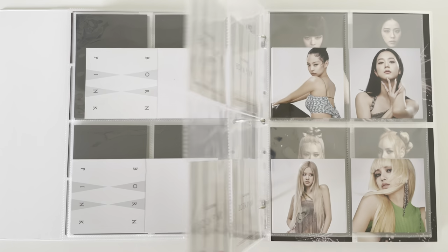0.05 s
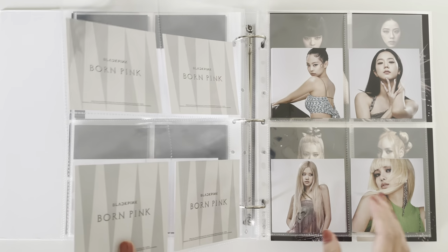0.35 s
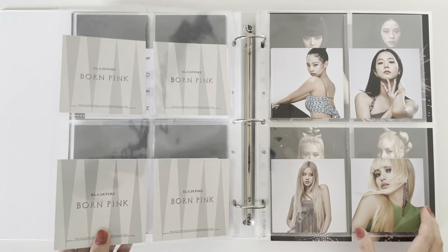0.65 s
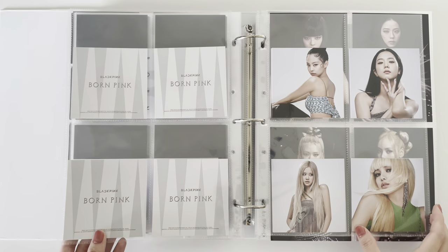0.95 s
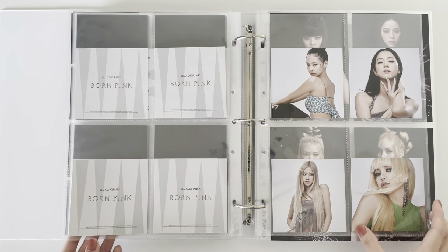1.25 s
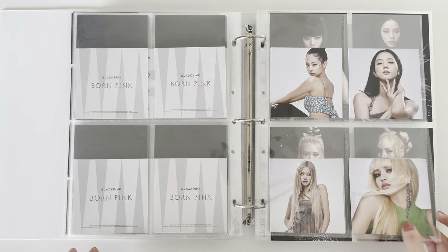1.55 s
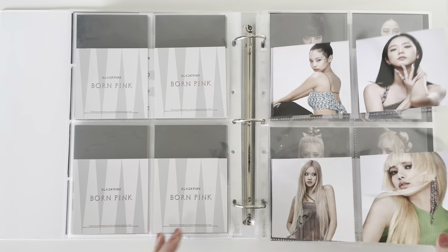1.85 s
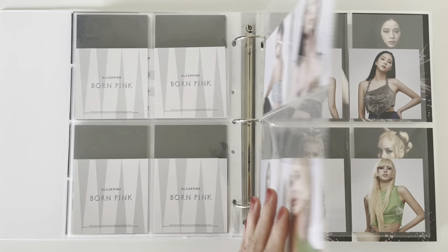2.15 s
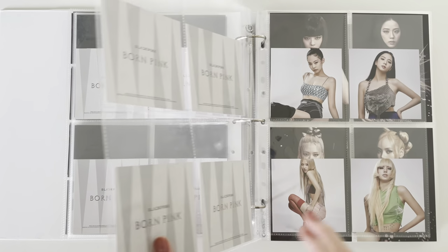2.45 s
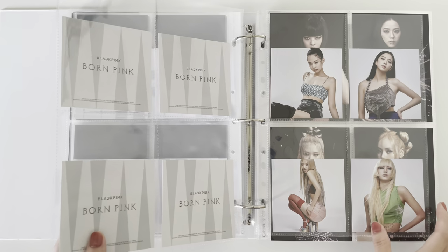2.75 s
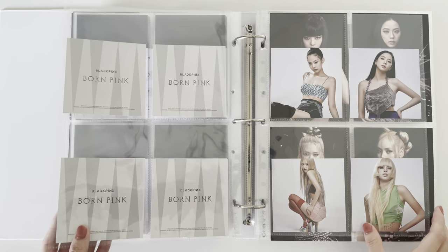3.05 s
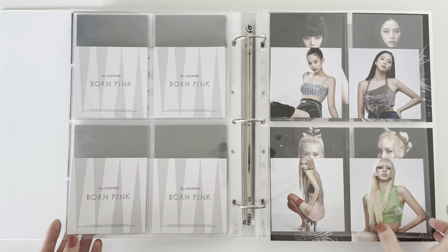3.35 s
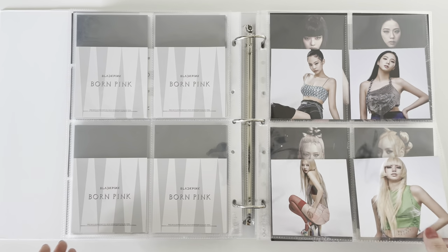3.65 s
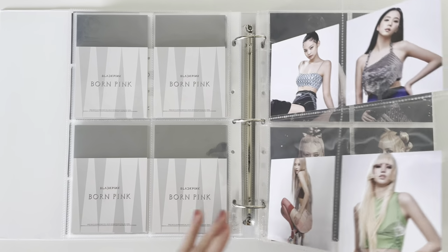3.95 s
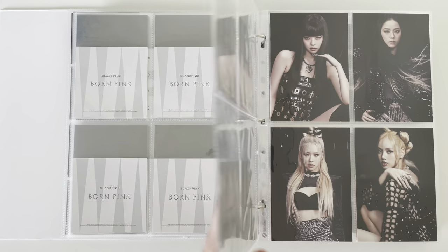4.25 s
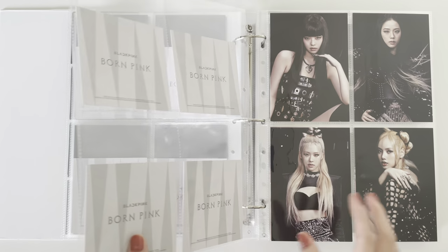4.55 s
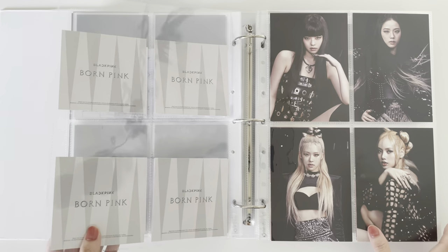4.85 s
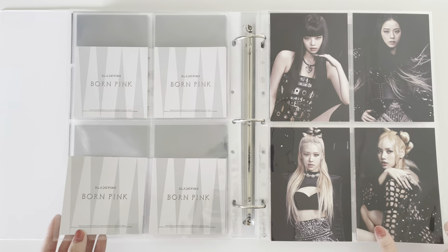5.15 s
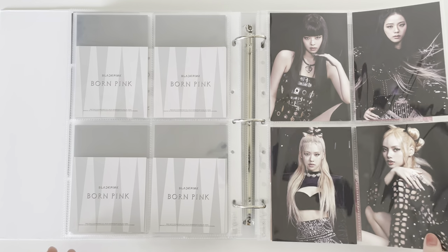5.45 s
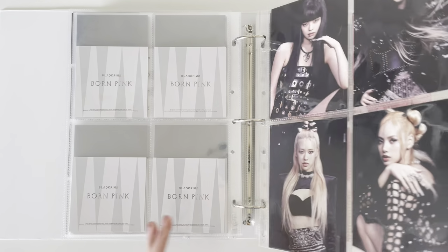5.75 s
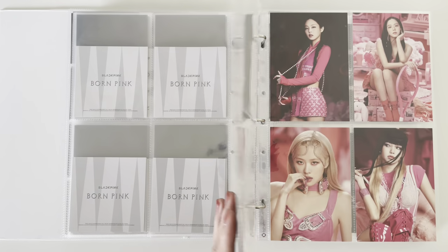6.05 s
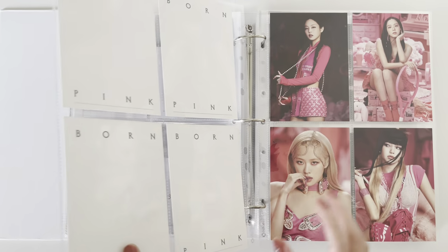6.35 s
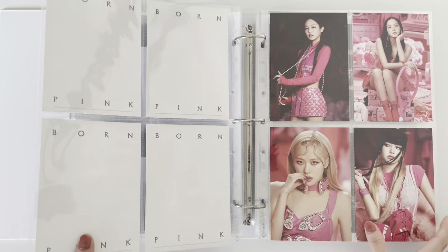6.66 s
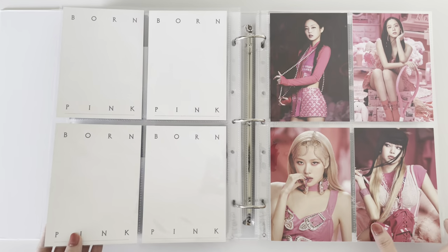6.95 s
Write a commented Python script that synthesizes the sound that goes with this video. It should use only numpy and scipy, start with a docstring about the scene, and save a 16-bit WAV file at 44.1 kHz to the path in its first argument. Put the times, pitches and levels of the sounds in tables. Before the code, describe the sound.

Plastic binder pages rustle and crinkle as they are turned, landing with light slaps and soft thumps over a low hum.

```python
"""Turning pages in a card binder

Plastic pocket pages full of cards are turned in a ring binder on a table, close to a phone.
The film slides with a hiss, flutters as it bends and buckles with small pops. Each landing page
pushes out air with a thump and sets the steel rings ringing. A low, uneven hum fills the small room."""
import sys
import numpy as np
from scipy import signal
from scipy.fft import rfft, irfft
from scipy.io import wavfile
from scipy.ndimage import uniform_filter1d

SR = 44100
rng = np.random.default_rng(int(sys.argv[2]) if len(sys.argv) > 2 else 0)


def inscribe(sig):
    """Save sig as 16-bit PCM at rate SR to the path in sys.argv[1].

    A 1-D sig is mono; a 2-D sig holds one channel per row.
    Samples are clipped to [-1, 1] before scaling.
    """
    pcm = np.round(np.clip(np.atleast_2d(sig).T, -1, 1) * 32767)
    wavfile.write(sys.argv[1], SR, pcm.astype(np.int16))


N = 313551
TIME, FREQS = np.arange(N) / SR, np.fft.rfftfreq(N, 1 / SR)
LEAD = 256  # samples of run-up before each snap


def gain_of(db):
    """Turns decibels into a number to multiply by."""
    return 10 ** (np.asarray(db) / 20)


def evened(x):
    """Scales a sound to an average strength (rms) of 1."""
    return x / np.sqrt(np.mean(x ** 2) + 1e-20)


def read(points, hz):
    """Looks up a table along a log-frequency axis."""
    f, value = np.transpose(points)
    return np.interp(np.log(hz + 1), np.log(f + 1), value)


def follow(rows):
    """Joins a table's timed points into curves."""
    s, *columns = np.transpose(rows)
    return [np.interp(TIME, s, column) for column in columns]


def add(mix, s, sound):
    """Mixes a sound in at s seconds."""
    part = mix[..., max(round(s * SR), 0):][..., :sound.shape[-1]]
    part += sound[..., :part.shape[-1]]


def coloured(x, points):
    """Gives x a tone colour, at strength 1."""
    return evened(irfft(rfft(x) * gain_of(read(points, FREQS)), N))


def spread(mid, side, share):
    """Makes left and right from a common and an opposed part."""
    return np.array([mid + share * side, mid - share * side]) / np.sqrt(1 + share ** 2)


def wavering(hz, depth, rate_hz):
    """A tone whose strength and phase drift by chance."""
    slow = np.exp(-(FREQS / rate_hz) ** 2)
    a, b = evened(irfft(rfft(rng.standard_normal((2, N))) * slow, N))
    turn = np.exp(2j * np.pi * np.cumsum(hz * np.ones(N)) / SR)
    return evened((turn * (1 + depth * (a + 1j * b) / np.sqrt(2))).real)


# The low drone. Each row: time in seconds, level in dB, pitch in Hz.
DRONE_CURVE = [(0.0, -69, 61.8), (0.16, -46.5, 56.1), (0.26, -72, 54.7), (0.34, -48, 54.3),
               (0.91, -47, 53.93), (1.15, -65.5, 57.2), (1.21, -41.5, 55.8), (1.27, -54.5, 53.6),
               (1.84, -41, 52.4), (2.04, -51.5, 53.35), (2.22, -43.5, 57), (2.43, -54, 59.6),
               (2.55, -46, 56.3), (2.93, -52.5, 54.5), (3.23, -45, 55.35), (3.44, -53, 55.4),
               (3.66, -52, 62.1), (3.86, -45, 55.1), (4.12, -54.5, 53.25), (4.36, -51.5, 61.3),
               (4.59, -50, 53.5), (4.75, -47, 53.2), (5.09, -62.5, 53.35), (5.31, -43.5, 53.3),
               (5.5, -58, 53.4), (5.66, -46.5, 52.8), (5.74, -69, 51), (5.98, -49.5, 56.14),
               (6.12, -67, 62.1), (6.28, -47, 52.84), (7.01, -56, 57.64), (7.11, -47, 54.1)]
# The mains tone. Each row: time in seconds, relative level in dB.
MAINS_CURVE = [(0.0, -83), (0.06, -55), (0.38, -76), (0.81, -57), (1.54, -89), (1.78, -53.5), (2.18, -67.5),
               (2.47, -58), (3.01, -78), (3.17, -62.5), (6.28, -65.5), (6.36, -56), (6.65, -66),
               (7.11, -68)]
# The colour of the room's air. Each row: frequency in Hz, gain in dB.
AIR_COLOUR = [(20, -25), (31, -0.5), (40, -11), (55, 10.5), (70, 10.5), (88, 2), (140, -3), (200, -16.5),
              (400, -25), (1000, -38), (3000, -43), (6000, -48), (15000, -97)]
def hum():
    """A wavering low drone, a weaker mains tone and the room's own air."""
    level_db, hz = follow(DRONE_CURVE)
    drone = gain_of(level_db) * wavering(hz, depth=0.55, rate_hz=6.6)
    mains = gain_of(follow(MAINS_CURVE)[0] + 0.5) * wavering(hz=100, depth=0.79, rate_hz=3.3)
    common, opposed = rng.standard_normal((2, N))
    # long waves reach both microphones alike
    opposed = irfft(rfft(opposed) * gain_of(read([(70, -28), (140, -11), (300, 3.5)], FREQS)), N)
    air = gain_of(-57.5) * coloured(spread(common, opposed, share=1), AIR_COLOUR)
    return drone + mains + air


def stroke(s, swell_s, ease_s):
    """A hand movement peaks at s; it is 19.5 dB down swell_s before and ease_s after."""
    near = slice(*np.searchsorted(TIME, [s - 4 * swell_s, s + 4 * ease_s]))
    away = np.maximum((s - TIME[near]) / swell_s, (TIME[near] - s) / ease_s)
    out = np.zeros(N)
    out[near] = gain_of(-19.5 * abs(away) ** 1.345)
    return out


def friction(colour, slips_per_s, uneven_db, smooth, patchy_db, width):
    """Tiny uneven slips over a smooth hiss; the film's resonances drift as it bends."""
    sizes = gain_of(uneven_db * np.minimum(rng.exponential(1, (2, N)), 4))
    slips = evened(sizes * rng.choice([-1, 1], (2, N)) * (rng.random((2, N)) < slips_per_s / SR))
    drive = spread(*(slips + smooth * rng.standard_normal((2, N))), share=width)
    bands = signal.stft(drive, nperseg=512, noverlap=384)[2]
    # random loud and soft patches, blurred over pitch, then time
    patches = uniform_filter1d(rng.standard_normal(bands.shape[1:]), size=4, axis=0)
    patches = evened(uniform_filter1d(patches, size=14, axis=1))
    drifting = signal.istft(bands * gain_of(patchy_db * patches), nperseg=512, noverlap=384)[1]
    return coloured(drifting[:, :N], colour)


# Film slides. Each row: peak time, swell and ease in seconds, hiss in dB, airy top in dB.
SLIDE_STROKES = [(.005, 0.032, 0.078, -57, -57), (.24, 0.032, 0.039, -56.5, -70),
                 (.53, .04, 0.12, -78.5, -76), (.78, 0.16, 0.25, -87, -81), (.97, 0.12, 0.094, -85, -80),
                 (1.16, 0.077, 0.11, -81, -74), (1.329, 0.013, 0.036, -56, -62),
                 (1.43, 0.097, 0.076, -70.5, -67.5), (1.595, .05, 0.047, -62.5, -70),
                 (1.785, 0.078, 0.044, -74, -67), (2.27, .11, 0.082, -65.5, -65),
                 (2.479, 0.073, 0.087, -60, -65), (2.69, .18, 0.24, -77.5, -74),
                 (3.14, 0.07, 0.17, -77, -73.5), (3.35, 0.11, 0.21, -72.5, -68.5),
                 (3.515, 0.024, 0.063, -72.5, -69), (3.65, 0.026, 0.085, -70, -68),
                 (4.21, .12, .14, -74.5, -74.5), (4.325, 0.058, 0.061, -70.5, -74),
                 (4.455, 0.068, 0.072, -74, -80), (4.7, 0.44, .35, -87, -79.5),
                 (5.02, 0.13, 0.21, -76, -73.5), (5.29, .2, 0.14, -68.5, -65.5),
                 (5.71, .06, 0.04, -74, -76), (6.11, 0.052, 0.097, -66.5, -68),
                 (6.32, 0.054, 0.11, -65, -67.5), (6.469, .12, 0.16, -86, -80),
                 (6.81, 0.2, 0.08, -76.5, -73), (7.08, 0.14, 0.11, -65.5, -69.5)]
# Their colour. Each row: frequency in Hz, gain in dB.
SLIDE_COLOUR = [(1500, -13), (3500, -1), (5000, 2), (6200, 7), (8000, 10.5), (10000, -24), (12000, 11.5),
                (14500, 12.5), (15500, 9.5), (16300, -3)]
def sliding():
    """Film hisses as it slides on film; its airy top has a strength of its own."""
    hiss_power = airy_power = gain_of(-87) ** 2  # pages barely stirring
    for s, swell_s, ease_s, hiss_db, airy_db in SLIDE_STROKES:
        shape = stroke(s, swell_s, ease_s)
        hiss_power = hiss_power + (gain_of(hiss_db) * shape) ** 2
        airy_power = airy_power + (gain_of(airy_db) * shape) ** 2
    skim = friction(SLIDE_COLOUR, slips_per_s=5600, uneven_db=6.5, smooth=1.2, patchy_db=3.5, width=0.7)
    airy = irfft(rfft(skim) * (FREQS > 10300), N)
    return np.sqrt(hiss_power) * evened(skim - airy) + np.sqrt(airy_power) * evened(airy)


def snap(shape_db, rise_s, scatter_db, scatter_fade_s, size=4096):
    """A crease gives way in a short run of slips; the burst then scatters among the pages."""
    hz, t = np.fft.rfftfreq(size, 1 / SR), np.arange(size) / SR
    log_gain = np.log(gain_of(np.maximum(shape_db(hz + 1), -70)))
    # a filter that rings only after it is struck
    colour = np.exp(np.conj(signal.hilbert(np.r_[log_gain, log_gain[-2:0:-1]])))[:len(hz)]
    burst = rfft(rng.standard_normal(size) * t * np.exp(-t / rise_s))
    pulse = colour * burst / abs(burst) ** .7
    pulse *= np.exp(-2j * np.pi * 0.00035 * np.sqrt(hz * 4000))  # bending waves bring the treble first
    scatter = spread(*rng.standard_normal((2, size)), share=0.71)
    scatter *= gain_of(-60 * t / scatter_fade_s) * (1 - np.exp(-t / 0.0006))
    sound = evened(irfft(pulse)) + gain_of(scatter_db) * evened(irfft(pulse * rfft(scatter)))
    sound = np.roll(sound, LEAD, axis=1) * signal.windows.tukey(size, LEAD / size)
    return sound * np.sqrt(.005 * SR / size)  # the direct burst has the energy of 5 ms at strength 1


def pop(hz, octaves, rise_s):
    """The dull pop of a pocket, over some low body of the cover."""
    def shape_db(f):
        cover = read([(100, -38), (220, -19), (380, 0), (550, -20), (900, -3.5), (3000, -64)], f)
        pocket = -15 * np.log(1 + (np.log2(f / hz) / octaves) ** 2 / 2.31)
        treble_loss = 11 * np.maximum(np.log2(f / 3700), 0)
        return np.maximum(pocket - treble_loss, cover)
    return snap(shape_db, rise_s, scatter_db=-1.5, scatter_fade_s=0.074)


# The colour of a cracking crease. Each row: frequency in Hz, gain in dB.
CRACK_COLOUR = [(1000, -23), (3000, 6), (4200, 1.5), (5000, -2), (6200, 4), (8000, 1.5), (10000, -16.5),
                (13000, -1.5), (16000, -11)]
def crack(level_db, rise_s):
    """The quick, bright part of a buckle."""
    sound = snap(lambda f: read(CRACK_COLOUR, f), rise_s / 2, scatter_db=3, scatter_fade_s=0.013)
    return gain_of(level_db - 1.5) * sound


# Pockets buckle. Each row: start in seconds, pop level in dB, pop pitch in Hz,
# relative crack level in dB, pop rise in seconds.
BUCKLES = [(.008, -51, 1960, -47.5, 0.00053), (.018, -68, 1320, -57, 0.001), (.0419, -49, 1560, -54, .0017),
           (.132, -44.5, 1280, -83, .0005), (.22, -56, 980, -61, 0.00045),
           (.2259, -54.5, 930, -60, 0.00029), (.7187, -49.5, 1158, -78, 0.0006),
           (.8769, -63, 1230, -100, 0.00018), (.9555, -56, 710, -88, .0003),
           (1.3275, -67, 1676, -62, 0.002), (1.3466, -60.5, 875, -75, 0.00087),
           (1.7314, -44, 1370, -81.5, 0.000075), (1.768, -61, 945, -73, 0.00025),
           (1.9732, -62, 1270, -86, 0.00099), (2.2875, -48, 2250, -59, 0.00085),
           (2.4207, -44.5, 1020, -62, 0.001), (2.4292, -43.5, 880, -60, 0.00085),
           (2.4359, -44.5, 764, -70, 0.00074), (2.5765, -51, 2060, -100, 0.00075),
           (3.1233, -59.5, 1053, -89, .001), (3.504, -81, 1755, -67, 0.0014),
           (3.6276, -57, 1967, -66, 0.00015), (3.6492, -53, 1340, -89, 0.00038),
           (3.6746, -46, 870, -56.5, 0.00028), (3.856, -52, 960, -76.5, 0.0003),
           (3.8766, -54, 1084, -97, 0.00086), (4.1156, -61, 661, -91, .002), (4.207, -67, 815, -75, .0014),
           (4.3089, -63, 1190, -82, 0.0013), (4.3266, -55, 1122, -63.5, 0.0013),
           (4.3793, -52, 598, -85, 0.00086), (4.4459, -51, 1760, -92, 0.0014),
           (5.0514, -59, 1106, -97, 0.00048), (5.3677, -64, 1617, -73, 0.0016),
           (5.4998, -57.5, 706, -71, 0.0013), (5.755, -59, 569, -92, 0.0011),
           (6.0829, -54.5, 802, -61.5, .0013), (6.1107, -53, 1608, -51.5, .0014),
           (6.1524, -58.5, 843, -68, 0.0017), (6.5773, -55.5, 684, -97, 0.0014),
           (6.7713, -55.5, 823, -86, 0.0022)]
def buckles():
    """The pocket pops and its crease cracks; a harder crack widens the pop's range of pitch."""
    out = np.zeros((2, N))
    for s, pop_db, hz, crack_db, rise_s in BUCKLES:
        octaves = 1.95 * 2 ** ((crack_db - pop_db) / 18)
        add(out, s - LEAD / SR, gain_of(pop_db) * pop(hz, octaves, rise_s))
        add(out, s + rise_s / 2 - LEAD / SR, crack(crack_db, rise_s))
    return out


# A hand bends a page. Each row: peak time, swell and ease in seconds, flutter in dB, rub in dB,
# flutter pitch in Hz.
PAGE_BENDS = [(0.047, 0.063, 0.05, -53.5, -54.5, 576), (0.142, 0.045, 0.16, -58, -62.5, 670),
              (.24, .025, 0.055, -65, -59, 940), (.45, 0.13, 0.23, -69.5, -79.5, 1590),
              (.63, 0.12, 0.086, -65.5, -85, 1020), (.728, 0.014, 0.33, -73.5, -77, 1120),
              (0.967, 0.0086, 0.044, -63, -89, 1130), (1.345, .03, 0.18, -94, -74.5, 1300),
              (1.605, 0.068, 0.052, -86, -61.5, 1420), (1.665, 0.055, 0.071, -68.5, -84, 1520),
              (1.77, 0.047, 0.074, -57, -60, 1200), (2.022, 0.14, 0.13, -65.5, -65, 1090),
              (2.191, 0.061, 0.065, -60, -67.5, 780), (2.309, 0.084, 0.086, -57, -60.5, 725),
              (2.477, 0.093, 0.11, -57.5, -51.5, 1050), (2.83, 0.87, 0.66, -70, -83, 960.2),
              (3.125, 0.063, 0.085, -67, -71, 1080), (3.515, 0.028, 0.082, -81, -62.5, 1570),
              (3.672, 0.074, 0.23, -65, -65.5, 1060), (3.8, 0.057, 0.064, -62.5, -65.5, 1040),
              (3.884, 0.088, 0.19, -55, -68, 1110), (4.13, 0.41, 0.25, -65, -70, 820),
              (4.329, 0.028, 0.16, -60.5, -62.5, 940), (4.39, .03, 0.14, -60.5, -66, 585),
              (4.453, 0.075, 0.12, -69, -68.5, 900), (4.792, 0.36, 0.17, -65.5, -70.5, 1210),
              (5.07, 0.058, 0.13, -64, -73, 1210), (5.373, 0.14, 0.083, -78, -66, 1430),
              (5.506, 0.017, 0.041, -66.5, -66.5, 1350), (5.72, 0.085, 0.027, -60, -62, 1040),
              (6.119, 0.23, 0.23, -64, -66, 680), (6.321, 0.057, 0.098, -56, -55, 700),
              (6.515, 0.054, 0.09, -65, -65.5, 795.5), (6.59, 0.058, 0.25, -66, -93, 860),
              (6.781, 0.17, 0.099, -63.5, -70.5, 840), (7.08, 0.12, 0.075, -82, -81, 1030)]
def bending():
    """How strongly the pages flutter and rub; the strongest bend leads the pitch."""
    flutter, rub, pitch = np.zeros((3, N))
    for s, swell_s, ease_s, flutter_db, rub_db, hz in PAGE_BENDS:
        shape = stroke(s, swell_s, ease_s)
        power = (gain_of(flutter_db) * shape) ** 2
        flutter += power
        pitch += hz * power
        rub += (gain_of(rub_db) * shape) ** 2
    rest_flutter, rest_rub = gain_of([-90.5, -82.5]) ** 2  # pages barely stirring under the fingers
    flutter += rest_flutter
    return np.sqrt(flutter), np.sqrt(rub + rest_rub), (pitch + 1050 * rest_flutter) / flutter


def peaked(x, hz, width_hz, share):
    """Adds a resonance that follows the curve hz."""
    turn = np.exp(2j * np.pi * np.cumsum(hz) / SR)
    r = np.exp(-np.pi * width_hz / SR)
    ringing = (turn * signal.lfilter([1], [1, -2 * r, r * r], x / turn)).real
    return evened(x + share * evened(ringing))


# The colours of fluttering and of rubbing film. Each row: frequency in Hz, gain in dB.
FLEX_COLOUR = [(100, -46), (200, 4), (400, 1), (650, 1), (1000, -0.5), (1500, -1.5), (2200, -15),
               (4000, -54)]
RUB_COLOUR = [(600, -26.5), (1100, -6.5), (1600, 3.5), (2400, 0), (3300, -2), (4100, -2.5), (4900, -12),
              (9000, -24)]
def rustle():
    """A bending page flutters hollowly, rubs on its neighbour and crinkles."""
    flex_gain, rub_gain, flutter_hz = bending()
    rubbing_hz = 2340 * (1000 / flutter_hz) ** 0.41  # sinks as the flutter rises
    flutter = friction(FLEX_COLOUR, slips_per_s=300, uneven_db=.5, smooth=.75, patchy_db=5.5, width=.77)
    rubbing = friction(RUB_COLOUR, slips_per_s=500, uneven_db=2.5, smooth=1, patchy_db=4.5, width=.65)
    flex = flex_gain * peaked(flutter, flutter_hz, width_hz=840, share=0.54)
    rub = rub_gain * peaked(rubbing, rubbing_hz, width_hz=1900, share=0.57)
    return flex + rub + crinkles(flex_gain, flutter_hz)


def crinkles(strength, flutter_hz, per_s=14):
    """Small pops at random moments follow the flutter's strength and pitch."""
    out = np.zeros((2, N))
    for k, (place, size, detune) in enumerate(rng.random((int(per_s * N / SR), 3))):
        at = min(int((k + place) / per_s * SR), N - 1)
        sound = pop(flutter_hz[at] * 2 ** (detune - .5), octaves=0.71, rise_s=0.00047)
        add(out, (at - LEAD) / SR, strength[at] * gain_of(-5 + 3.9 * (size - .5)) * sound)
    return out


# A page tugs at the rings. Each row: start in seconds, strength in dB.
RING_TUGS = [(.044, -77), (.1325, -71), (2.289, -64), (2.4725, -55), (2.5775, -89), (3.675, -79),
             (4.447, -69), (5.503, -71), (6.112, -67), (6.3172, -55.5)]
# The notes of cover and rings. Each row: pitch in Hz, gain in dB, seconds to fade by 60 dB.
BINDER_NOTES = [(262, -3, .25), (388, -1, .32), (479, 0, .28), (690, -2, .22), (762, -5, .25),
                (806, -3, .22), (900, -6, .15), (1061, -2, .2), (1712, -8, .2), (2028, 0, .18),
                (2118, 4, .19), (2228, -3, .18), (2376, -2, .17), (2428, -1, .18), (2510, -3, .13),
                (2556, -3, .13), (2730, -4, .17), (3053, -5, .13), (3692, -5, .18), (3953, -4, .16)]
def rings(pages, coupling_db):
    """Tugs, and more faintly all page noise, set the cover and steel rings ringing."""
    t = np.arange(SR // 2) / SR
    drive = gain_of(coupling_db) * pages.mean(0)
    for s, db in RING_TUGS:
        add(drive, s, gain_of([db]))
    # each note reaches left and right a little out of step
    skews = 0.21 * rng.standard_normal((len(BINDER_NOTES), 1)) * np.array([1, -1])
    ring = sum(gain_of(db - 60 * t / fade_s) * np.sin(2 * np.pi * hz * t + skew[:, None] + np.pi * k)
               for k, ((hz, db, fade_s), skew) in enumerate(zip(BINDER_NOTES, skews)))
    return signal.fftconvolve(drive[None], ring, axes=1)[:, :N]


# A page or hand lands. Each row: start in seconds, level in dB, pitch in Hz, seconds to fade by 60 dB.
LANDINGS = [(0.048, -39.5, 125, 0.08), (.137, -43, 127, 0.09), (2.333, -40, 139, 0.054),
            (2.431, -46, 142, 0.15), (2.477, -44.5, 138, 0.17), (4.446, -49, 150, 0.14),
            (6.111, -44.5, 130.6, 0.087), (6.342, -31.5, 86.9, 0.065)]
def thumps():
    """A cushion of air and the soft cover give a few low swings."""
    out, t = np.zeros(N), np.arange(SR // 3) / SR
    for s, db, hz, fade_s in LANDINGS:
        envelope = gain_of(db - 60 * t / fade_s) * (1 - np.exp(-t / 0.0026))
        add(out, s, envelope * np.sin(2 * np.pi * hz * t))
    return out


# Crease ticks. Each row: start in seconds, level in dB.
CREASE_TICKS = [(.525, -58.5), (.993, -66), (1.15, -57), (1.563, -47), (1.768, -52), (2.81, -64),
                (3.135, -60), (3.2105, -64), (3.505, -51), (3.6286, -49), (3.9347, -67), (5.659, -68.5),
                (6.8092, -51)]
# Their thin, glassy colour. Each row: frequency in Hz, gain in dB.
TICK_COLOUR = [(1000, -13), (3000, -4), (4200, -12), (6200, -7), (8000, 0.5), (10000, -12.5), (13000, 3),
               (16000, 4.5)]
def ticks():
    """Creases flip with thin, bright ticks, some alone and some on top of a pocket's pop."""
    out = np.zeros((2, N))
    for s, db in CREASE_TICKS:
        tick = snap(lambda f: read(TICK_COLOUR, f), rise_s=0.00036, scatter_db=-2, scatter_fade_s=.032)
        add(out, s - LEAD / SR, gain_of(db) * tick)
    return out


# A page slaps onto the pile. Each row: start in seconds, relative levels of clack and crack in dB,
# clack rise in seconds.
PAGE_SLAPS = [(2.4611, -29.5, -54, 0.001), (2.4668, -39, -53, 0.0012), (2.471, -29, -45.5, 0.00051),
              (2.477, -66, -65, .001), (2.4823, -31, -68, .001), (2.491, -36, -65, 0.00091),
              (6.309, -33.5, -61, 0.0024), (6.3159, -31, -46.5, 0.00039), (6.323, -63, -63, 0.00099)]
# Its hollow colour. Each row: frequency in Hz, gain in dB.
SLAP_COLOUR = [(120, -27), (350, -10.5), (700, -2.5), (1000, -2), (1400, -10), (1800, -3.5), (2200, 5.5),
               (2650, -4), (3100, -3), (3700, -8), (4500, -15), (8000, -48)]
def slaps():
    """The rows of pockets land one after another, each a hollow clack."""
    out = np.zeros((2, N))
    for s, level_db, crack_db, rise_s in PAGE_SLAPS:
        clack = snap(lambda f: read(SLAP_COLOUR, f), rise_s, scatter_db=-2, scatter_fade_s=0.08)
        add(out, s - LEAD / SR, gain_of(level_db - 7) * clack)
        add(out, s + rise_s / 2 - LEAD / SR, crack(crack_db, rise_s))
    return out


# The room's echo. Each row: frequency in Hz, seconds to fade by 60 dB.
ROOM_FADES = [(150, 0.33), (600, 0.19), (2500, 0.084), (7000, 0.16), (15000, 0.05)]
def room(x, level_db):
    """Scattered reflections, each band dying at its own speed."""
    count = SR // 2
    echoes = rng.choice([-1., 1.], (2, count)) * (rng.random((2, count)) < 3000 / SR)
    echoes *= TIME[:count] > .005
    hz, t, bands = signal.stft(spread(*echoes, share=0.31), SR, nperseg=256)
    tail = signal.istft(bands * gain_of(-60 * t / read(ROOM_FADES, hz)[:, None]), SR, nperseg=256)[1]
    return gain_of(level_db) * signal.fftconvolve(x, tail / np.linalg.norm(tail[0]), axes=1)[:, :N]


def scene():
    """Pages and binder in the humming room."""
    pages = buckles() + ticks() + slaps() + rustle() + sliding()
    binder = pages + rings(pages, coupling_db=-74) + thumps()
    return binder + room(binder, level_db=-11) + hum()


# Stereo width. Each row: frequency in Hz, gain in dB of what differs between left and right.
STEREO_WIDTH = [(500, 1.5), (900, 5.5), (1800, -6.5), (3000, 1.5), (5000, -1.5), (8000, -4), (10300, -10),
                (12300, 2), (15000, -10)]
# The right channel's lag. Each row: frequency in Hz, lag in radians.
RIGHT_LAG = [(5200, 0), (6500, 1.03), (8200, 4.5), (10300, -4.5), (11800, 4.5), (13200, 4.5), (15000, 7)]
def record(dry):
    """The right channel drifts out of step with the left in the treble; sound above 16.1 kHz is cut."""
    left, right = rfft(dry)
    mid = (left + right) / 2
    side = (left - right) / 2 * gain_of(read(STEREO_WIDTH, FREQS))
    lag = np.exp(-1j * read(RIGHT_LAG, FREQS))
    mics = irfft(np.array([mid + side, (mid - side) * lag]), N)
    lowpass = signal.firwin(255, 16100, window=("kaiser", 9), fs=SR)
    return signal.oaconvolve(mics, lowpass[None], "same")


dry = scene()
out = record(dry)
inscribe(out)
```